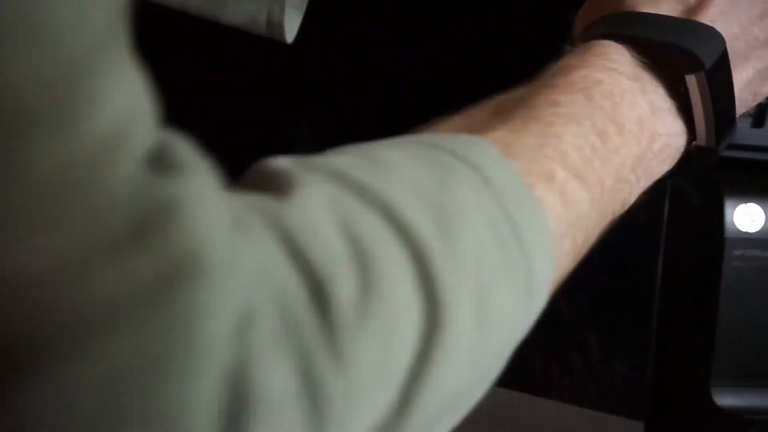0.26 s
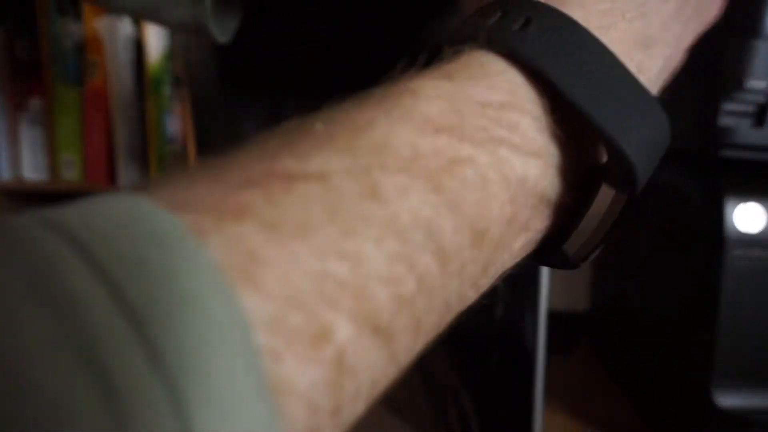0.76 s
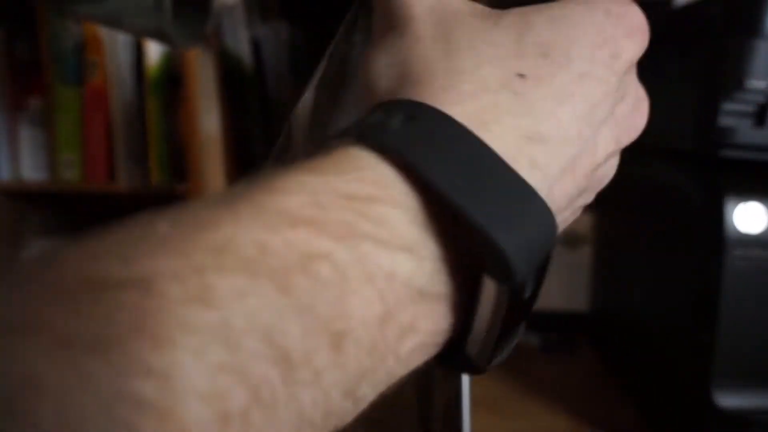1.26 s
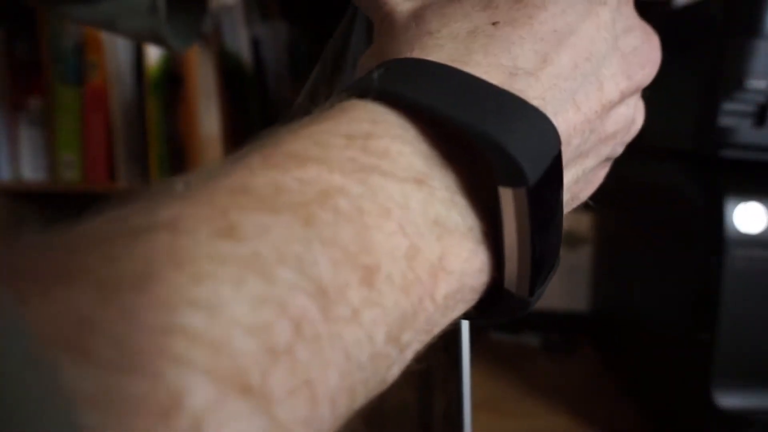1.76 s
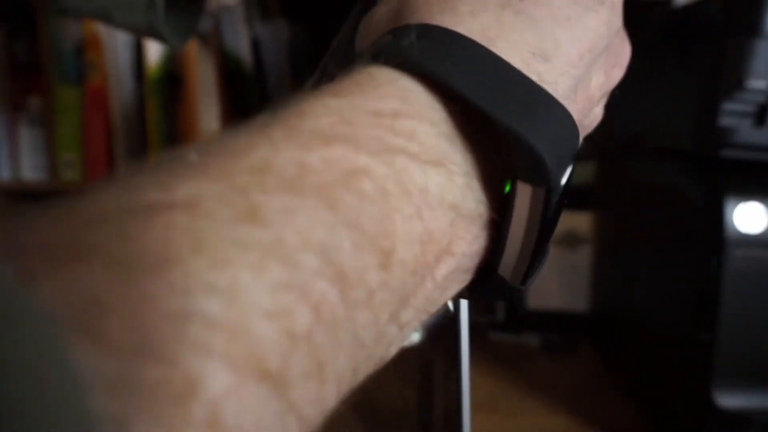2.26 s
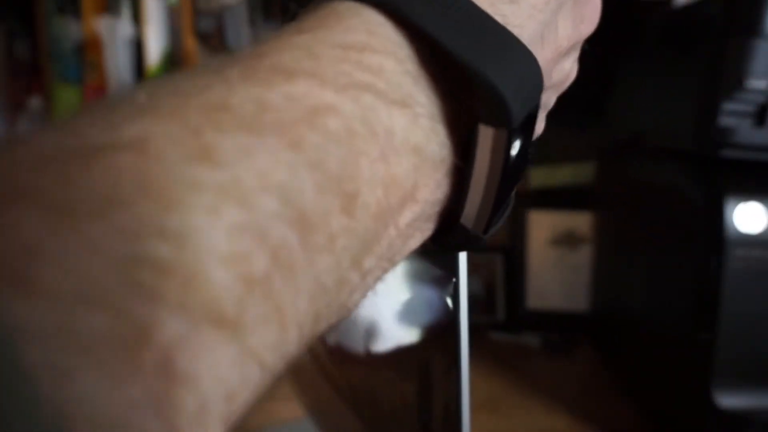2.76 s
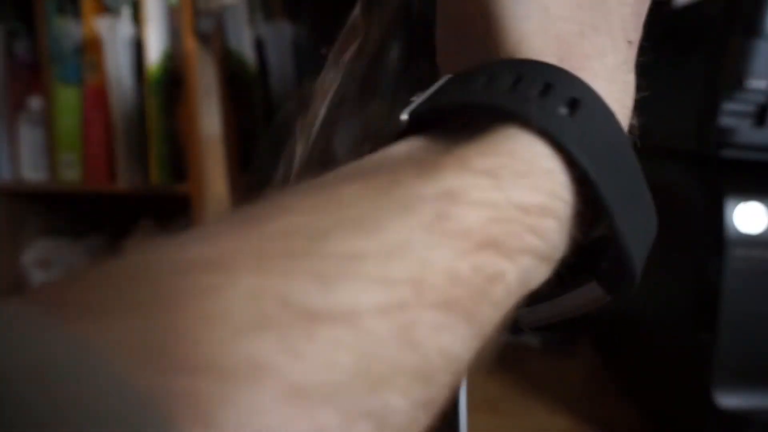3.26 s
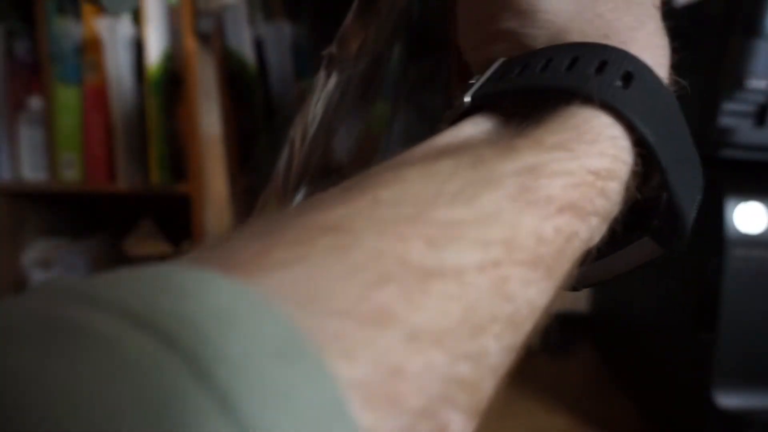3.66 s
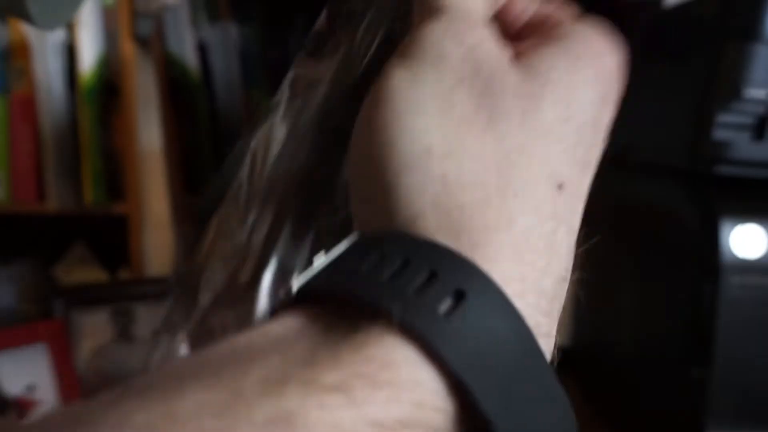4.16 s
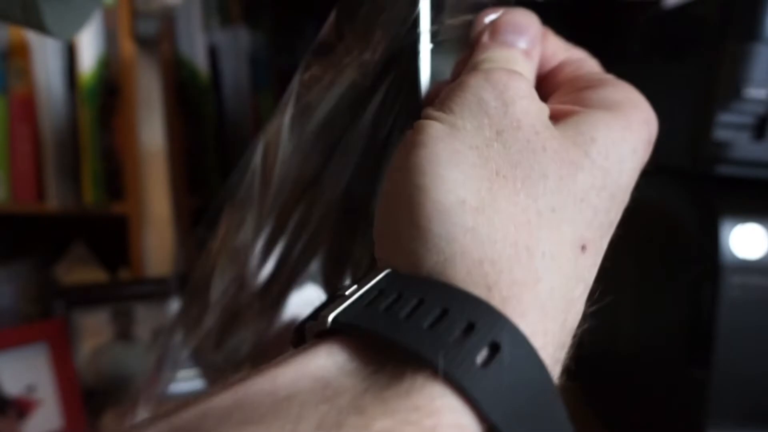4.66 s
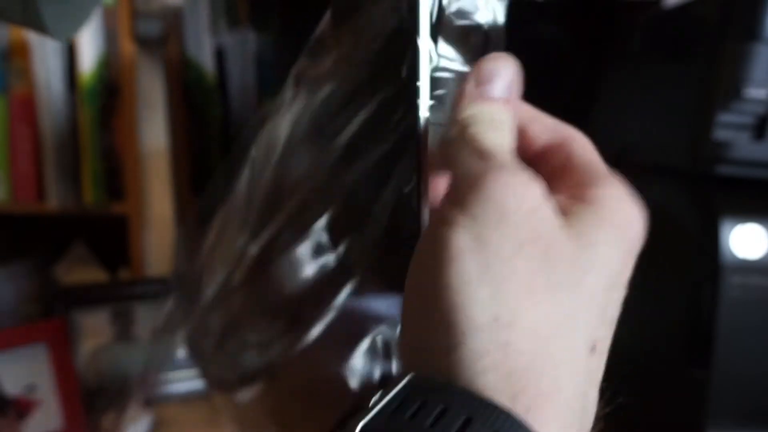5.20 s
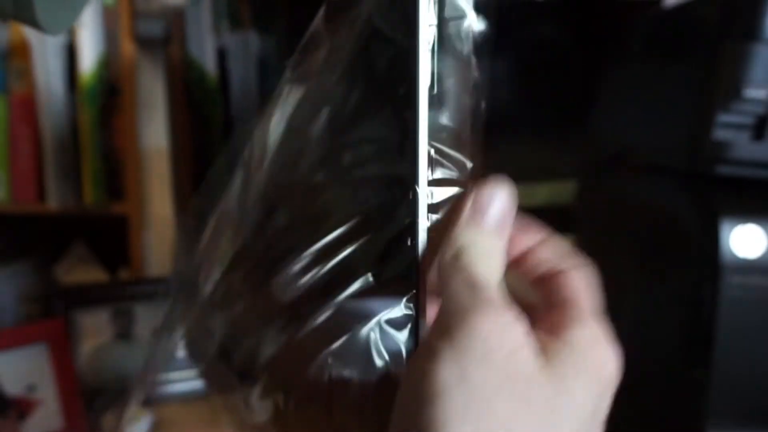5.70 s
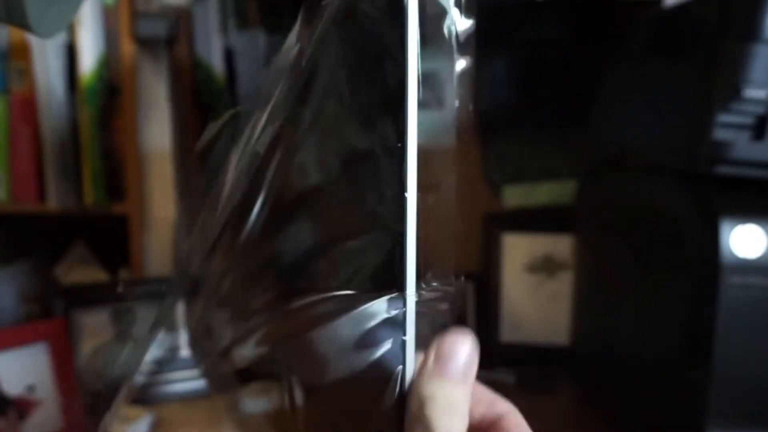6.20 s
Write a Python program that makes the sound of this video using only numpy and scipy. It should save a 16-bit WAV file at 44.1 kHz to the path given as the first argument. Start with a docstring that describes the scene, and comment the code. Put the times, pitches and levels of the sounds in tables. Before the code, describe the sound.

Thin plastic film is peeled by hand off a glass panel, close to the microphone in a small furnished room with little echo and quiet room tone. It begins with a faint rustle and a few tiny ticks. From about 0.5 seconds, sharp, bright snaps come irregularly, singly and in clusters, with finer crinkling between them. From around 1 second, tugs knock occasional soft, low thuds from the taut sheet and panel. Fingers drag faintly on the glass between about 1.6 and 3.4 seconds. The crackle thins briefly near 3.6 seconds, then returns at 4 seconds, denser, with rustling that swells on each short pull. From 5 seconds the crinkling is fuller and the snaps slightly lower in pitch, while the loose sheet rumbles softly as it sways. The strongest rustles come around 5.5 to 6 seconds, and the crackling continues until about 6.4 seconds.

```python
"""A faint rustle, then sharp snaps: thin plastic film is peeled by hand off a glass panel,
close to a camera in a small furnished room. Creases buckle and snap, each pitched by its size,
and finer crinkles rustle between them. Tugs make the taut sheet and its panel thud, the loose
sheet rumbles, and fingers drag softly on the glass, all over quiet room tone."""
import sys
import numpy as np
from scipy import signal
from scipy.fft import rfft, irfft, next_fast_len
from scipy.io import wavfile
from scipy.ndimage import map_coordinates

SR = 44100
rng = np.random.default_rng(int(sys.argv[2]) if len(sys.argv) > 2 else 0)


def output_pcm(signal):
    """Save a mono or channel-first signal as 16-bit PCM at the path in sys.argv[1].

    Samples are clipped to [-1, 1] before scaling.
    """
    pcm = np.clip(np.atleast_2d(signal).T, -1, 1) * 32767
    wavfile.write(sys.argv[1], SR, np.round(pcm).astype(np.int16))


N = 284004


def amp(db):
    return 10 ** (np.asarray(db) / 20)


def unit_rms(x):
    return x / np.sqrt(np.mean(x ** 2) + 1e-20)


def along(points, hz):
    """Read a curve of (Hz, value) points on a log frequency axis."""
    freqs, values = np.transpose(points)
    return np.interp(np.log(hz + 1), np.log(freqs + 1), values)


def filtered(x, response):
    """EQ x with a gain given as a function of Hz."""
    size = next_fast_len(x.shape[-1] + 8192)
    return irfft(rfft(x, size) * response(np.fft.rfftfreq(size, 1 / SR)), size)[..., :x.shape[-1]]


def wobble(rate):
    """A smooth random curve, rate knots a second."""
    return map_coordinates(rng.standard_normal(int(N * rate / SR) + 4), [np.arange(N) * rate / SR])


def swells(rest_db, start, held, db, rise_db_per_s, fall_db_per_s):
    """A fader ride in dB: each move climbs out of the resting level, holds from start and dies away."""
    hop = 32
    age = np.arange(0, N, hop) / SR - start[:, None]
    released = np.maximum(age - held[:, None], 0)
    moves_db = db[:, None] + rise_db_per_s * np.minimum(age, 0) - fall_db_per_s * released
    return np.maximum(rest_db, np.repeat(moves_db.max(axis=0), hop)[:N])


# Stereo image of diffuse sound. Each row: frequency in Hz, left-right correlation.
DIFFUSE_LIKENESS = [(200, 0.89), (700, 0.73), (1500, 0.076), (4000, 0.14), (12000, 0.39)]
def diffuse(pair):
    """Two unrelated signals become a left and right as alike as the room makes them."""
    angle = lambda hz: np.arccos(np.clip(along(DIFFUSE_LIKENESS, hz), -1, 1)) / 2
    mid, side = filtered(pair, lambda hz: np.array([np.cos(angle(hz)), np.sin(angle(hz))]))
    return np.array([mid + side, mid - side])


# Colour of the background. Each row: frequency in Hz, gain in dB.
ROOM_TONE_EQ = [(15, -71), (25, -35), (229, -27.5), (309, -2), (394, -15.5), (14800, -49.5), (16000, -22)]
def room_tone():
    """A steady bed of room tone and microphone hiss."""
    noise = diffuse(rng.standard_normal((2, N)))
    return amp(-61) * unit_rms(filtered(noise, lambda hz: amp(along(ROOM_TONE_EQ, hz))))


def crinkle(eq, rate, spread_db):
    """Tiny creases fire at random, in clumps, a few much larger than the rest."""
    clumps = amp(3.5 * wobble(30))
    fires = rng.random(N) < rate * clumps / SR
    sizes = amp(spread_db * np.minimum(rng.exponential(size=N), 2.8)) * rng.standard_normal(N)
    return unit_rms(filtered(fires * sizes, lambda hz: amp(along(eq, hz))))


def rustle(level_db, eq, gentle_db):
    """Gentle motion slides almost smoothly; firmer motion breaks into separate crinkles."""
    firmness = np.clip((level_db - gentle_db) / 18, 0, 1)
    grains = crinkle(eq, rate=600, spread_db=4.5)
    slide = crinkle(eq, rate=7000, spread_db=0.5)
    return amp(level_db) * (np.sqrt(firmness) * grains + np.sqrt(1 - firmness) * slide)


# Colours of fine crinkles and of large folds. Each row: frequency in Hz, gain in dB.
FINE_EQ = [(1200, -25), (2800, -3), (6000, 1.5), (11000, 3), (16000, -3.5)]
FOLD_EQ = [(250, 2), (600, 2.5), (1300, 7), (2400, 4), (7000, -6), (16000, -47.5)]
# The film shifting between pulls. Each row: time in seconds, crinkle level in dB, fold level in dB.
FILM_SHIFTS = [(0, -61, -54.5), (.15, -75, -69), (.5, -56.5, -52), (1.15, -58, -51), (1.63, -68, -75),
               (1.8, -58, -73), (1.95, -56.5, -67), (2.45, -53, -66), (2.65, -51.5, -57), (2.81, -61, -75),
               (3.05, -48.5, -72), (3.27, -65, -70), (3.6, -62.5, -73), (3.75, -69.5, -96),
               (4.099, -54, -70), (4.75, -56.5, -53), (5.45, -64.5, -65), (6.44, -59.5, -63)]
# Pulls. Each row: time of full speed in seconds, hold in seconds, crinkle level in dB, fold level in dB.
FILM_PULLS = [(.28, 0.1, -56.5, -58), (.45, 0.051, -49.5, -56), (.55, 0.0087, -56, -46.5),
              (.65, 0.09, -45, -47.5), (.79, .02, -53.5, -45), (0.979, 0.0041, -49.5, -42),
              (1.3, 0.06, -51, -45.5), (1.36, 0.069, -51.5, -44.5), (1.68, 0.069, -51.5, -49.5),
              (2.099, 0.084, -53, -49.5), (2.25, 0.052, -42.5, -54), (2.72, .05, -44.5, -69),
              (2.84, 0.08, -43, -56.5), (3.171, 0.016, -55.5, -48), (3.34, .02, -50.5, -52.5),
              (3.94, 0.073, -43.5, -62.5), (4.19, 0.011, -35.5, -48.5), (4.32, .01, -43, -54),
              (4.439, 0.13, -43, -73), (4.641, 0.0089, -35, -35), (4.869, 0.0098, -47.5, -54.5),
              (5.07, 0.012, -36.5, -42.5), (5.301, 0.022, -40.5, -37.5), (5.572, 0.017, -33.5, -32),
              (5.749, 0.017, -38.5, -37), (6.031, 0.007, -30, -38), (6.219, 0.014, -40.5, -36.5),
              (6.34, 0.034, -44.5, -50)]
def film_rustle():
    """Bright crinkles and darker folds rustle as the film moves, swelling with each pull."""
    now = np.arange(N) / SR
    shift_times, fine_rest_db, fold_rest_db = np.transpose(FILM_SHIFTS)
    start, held, fine_db, fold_db = np.transpose(FILM_PULLS)

    def ride(rest_db, pull_db):
        floor_db = np.interp(now, shift_times, rest_db)
        return swells(floor_db, start, held, pull_db, rise_db_per_s=288.5, fall_db_per_s=212.5)

    fine = rustle(ride(fine_rest_db, fine_db), FINE_EQ, gentle_db=-58.5)
    folds = rustle(ride(fold_rest_db, fold_db), FOLD_EQ, gentle_db=-59.0)
    return fine + folds


def bursts(start, db, hz, width, half_power_s, samples):
    """Each hit is a click and a short noisy flutter through a broad resonance; width is 1/Q."""
    age = np.arange(samples) / SR
    flutter_db = -3 * age / np.reshape(half_power_s, (-1, 1))
    kick = 0.5 * amp(flutter_db) * rng.standard_normal((len(start), samples))
    kick[:, 0] = 1
    u = 1j * np.fft.rfftfreq(2 * samples, 1 / SR) / hz[:, None]
    resonance = u * width / (1 + u * width + u * u)
    # a crease radiates little far below or far above its own pitch
    radiation = (u / (u + 0.18)) ** 2 / (1 + 0.37 * u)
    hits = irfft(rfft(kick, 2 * samples) * resonance * radiation)[:, :samples]
    hits *= amp(db)[:, None] / np.abs(hits).max(axis=1, keepdims=True)
    positions = np.round(start * SR).astype(int)[:, None] + np.arange(samples)
    return np.bincount(positions.ravel(), hits.ravel(), N + samples)[:N]


# Buckling creases. Each row: start in seconds, level in dB, pitch in Hz, body in dB over the crack.
CREASE_SNAPS = [(.1505, -44, 1890, 7), (.2704, -33.5, 5530, -15), (.2987, -31.5, 4250, -4),
                (0.4672, -25, 2060, 4.5), (0.5309, -19.5, 3600, -6.5), (.5971, -15.5, 6500, -16),
                (0.6147, -6.5, 6000, -14.5), (0.62, -13.5, 7450, -39), (.681, -17, 4800, -14),
                (0.7666, -20, 3880, 2), (.9261, -8, 5650, -14.5), (1.0662, -10, 5400, -22),
                (1.164, -25, 8400, -12), (1.205, -10, 3860, -10), (1.2329, -10.5, 2430, -6),
                (1.241, -10.5, 6400, -7), (1.2642, -2, 8800, -19.5), (1.365, -26, 2970, 3),
                (1.4197, -23, 5630, -1), (1.43, -8, 11300, -25), (1.4397, -7, 9400, -17),
                (1.581, -30, 6850, -19), (1.743, -24, 3620, -3.5), (1.8122, -17, 8100, -9),
                (1.98, -15.5, 8950, -23), (1.999, -14.5, 7100, -18), (2.0071, -6, 7700, -3),
                (2.2152, -16, 7900, -41), (2.219, -18.5, 3870, -14), (2.3432, -16, 5730, -12),
                (2.3504, 0, 7900, -50.5), (2.5124, -24.5, 6570, -9), (2.552, -8, 7400, -16.5),
                (2.5559, -12.5, 6300, -8.5), (2.8464, -1.5, 5830, -18.5), (2.9254, -20.5, 8050, -19),
                (2.9629, -14.5, 9700, -25), (2.9773, -3, 7500, -27), (3.155, -20, 5600, -35),
                (3.1738, -15, 4800, -20), (3.1897, -16, 5600, -10.5), (3.2944, -15, 6800, -17),
                (3.3448, -16, 7200, -23), (3.349, -6.5, 10000, -15), (3.521, -20.5, 10300, -21),
                (3.638, -40, 6440, -5), (3.9481, 0, 9200, -44), (3.9764, -14.5, 9300, -21),
                (3.98, -13, 6400, -23), (3.9872, -15, 6800, -39), (4.006, -15.5, 8250, -17),
                (4.0265, -13, 9300, -37.5), (4.034, -13, 7450, -53), (4.0373, -4.5, 7660, -34),
                (4.064, -16, 10000, -35), (4.146, -11.5, 9100, -47.5), (4.1772, -18.5, 10900, -33),
                (4.191, -3.5, 4720, -14.5), (4.2038, -8.5, 8500, -12), (4.3208, -10, 4150, -33),
                (4.4238, -20.5, 7600, -38), (4.4336, -8, 6850, -25), (4.4875, 2.5, 7850, -56),
                (4.4931, -4, 7050, -26), (4.5935, -1.5, 6400, -48), (4.5993, -10, 8000, -44),
                (4.613, -6.5, 6300, -37), (4.624, -3.5, 6900, -39), (4.6277, -7, 6760, -30),
                (4.6325, -8.5, 6700, -11.5), (4.6389, -5, 9100, -25), (4.664, -11, 6560, -31),
                (4.745, -9.5, 6200, -6.5), (4.7728, -8.5, 5240, -31), (4.8251, -3, 9200, -34),
                (4.861, -10.5, 4760, -13), (4.8743, -12.5, 6400, -16), (4.979, -18.5, 8100, -18),
                (5.0335, -14.5, 6160, -20), (5.0388, -21.5, 3370, 2), (5.0476, -14.5, 4900, -31),
                (5.0515, -11.5, 6700, -33), (5.0633, -1, 7600, -41), (5.0726, -4.5, 8040, -32),
                (5.1027, -11.5, 4440, -13), (5.1168, -7.5, 7800, -24), (5.138, -15, 8700, -30.5),
                (5.204, -21.5, 4800, -29.5), (5.2275, -8, 5660, -24), (5.2593, -9.5, 3770, -0.5),
                (5.2636, -5.5, 4240, -12), (5.3094, -18.5, 3900, -0.5), (5.499, -26.5, 4970, -34),
                (5.5145, -6, 3940, -35), (5.527, -9, 6600, -26), (5.541, -5.5, 8200, -39),
                (5.5493, -5, 5600, -31), (5.5563, -6.5, 7600, -29.5), (5.573, -6, 5660, -13),
                (5.5934, -7, 4760, -18), (5.6978, -7.5, 6660, -40), (5.7137, -3, 3660, -22),
                (5.7321, -11, 3020, -4.5), (5.739, -5.5, 3830, -11.5), (5.8274, -8.5, 6150, -20.5),
                (5.8671, -17, 3500, -5.5), (5.8805, -9.5, 4870, -13.5), (5.988, -19.5, 8100, -41),
                (5.9914, -0.5, 4470, -53), (5.9969, -6, 4960, -17), (6.0081, -4, 6600, -36),
                (6.033, -9, 8350, -17.5), (6.0502, -5, 2650, -13.5), (6.075, -11, 3100, -28),
                (6.1767, -9, 4400, -13.5), (6.2081, -13, 5940, -6), (6.2478, -14, 3600, -18),
                (6.327, -9.5, 3960, -20.5), (6.351, -14.5, 6000, -24.5), (6.3756, -22, 4700, -8.5)]
# Flutter shortens as the film is drawn tighter. Each row: time in seconds, factor on flutter length.
FLUTTER_SCALE = [(0, 1.3), (2.2, 1.26), (4.5, 0.84), (6.44, 0.65)]
def crease_snaps():
    """A crease flips: a crack pitched by its size, and a duller push of the film around it."""
    start, db, hz, body_db = np.transpose(CREASE_SNAPS)
    scatter = rng.standard_normal((len(start), 2))
    flutter_ms = 0.39 + 0.005 * body_db  # more body flutters longer
    flutter_ms *= np.interp(start, *np.transpose(FLUTTER_SCALE))
    flutter_ms = np.clip(flutter_ms, 0.05, 1) * np.exp(0.2 * scatter[:, 0])
    crack = bursts(start, db - 0.5, hz, width=1.79, half_power_s=flutter_ms / 1000, samples=384)
    body_hz = 950 * np.exp(0.15 * scatter[:, 1])
    body = bursts(start, db + body_db - 0.5, body_hz, width=1.0, half_power_s=0.00039, samples=512)
    return crack + body


# Tugs on the sheet. Each row: start in seconds, level in dB, pitch in Hz.
SHEET_TUGS = [(0.93, -30.5, 356), (1.059, -28.5, 320), (1.117, -30.5, 322), (1.117, -37.5, 118),
              (1.65, -38, 308), (1.814, -19, 340), (2.006, -27, 302), (2.346, -31.5, 308),
              (2.457, -32.5, 317), (2.529, -39.5, 133), (2.606, -22.5, 320), (2.841, -20.5, 340),
              (3.065, -35, 306), (3.168, -36.5, 323), (4.187, -29, 340), (4.315, -33.5, 340),
              (4.422, -36, 213), (4.862, -27, 312), (5.257, -19, 301), (5.594, -31, 204), (5.827, -30, 302),
              (5.85, -31, 110), (6.303, -36, 313), (6.308, -33, 113)]
def tug_thuds():
    """A tug knocks a short, low thud out of the taut sheet and its panel."""
    start, db, hz = np.transpose(SHEET_TUGS)
    return bursts(start, db + 0.5, hz, width=0.3, half_power_s=0.0012, samples=2048)


# Colour of the rumble. Each row: frequency in Hz, gain in dB.
RUMBLE_EQ = [(18, -61), (30, -24.5), (108, -13), (214, -1.5), (443, -4.5), (800, -18), (1040, -74),
             (1760, -120)]
# The loose sheet between jolts. Each row: time in seconds, level in dB.
SHEET_SWAY = [(0, -72), (1.2, -57), (1.6, -64.5), (2.1, -57), (2.4, -67), (2.69, -56.5), (3.44, -66),
              (4.4, -65), (5.4, -52), (6.12, -61), (6.44, -50)]
# Jolts. Each row: time of full level in seconds, hold in seconds, level in dB.
SHEET_JOLTS = [(.96, 0.0092, -44), (1.13, 0.009, -48), (4.44, 0.0061, -50.5), (4.95, 0.11, -45.5),
               (5.86, 0.013, -40.5), (6.33, 0.085, -46.5)]
def sheet_rumble():
    """The loose sheet rumbles as it sways, louder when jolted."""
    sway_db = np.interp(np.arange(N) / SR, *np.transpose(SHEET_SWAY))
    level_db = swells(sway_db, *np.transpose(SHEET_JOLTS), rise_db_per_s=220, fall_db_per_s=142)
    return amp(level_db) * crinkle(RUMBLE_EQ, rate=400, spread_db=2.0)


# Resonances of the glass. Each row: pitch in Hz, bandwidth in Hz, gain in dB.
PANEL_MODES = [(328, 40, 2), (534, 60, -11), (784, 18, -11), (970, 23, -12)]
# Fingers on the panel. Each row: time of full level in seconds, hold in seconds, level in dB.
FINGER_DRAGS = [(1.66, 0.11, -46.5), (2.04, 0.24, -44.5), (2.455, 0.067, -52), (2.63, .18, -48.5),
                (2.88, .1, -55.5), (3.08, 0.022, -56), (3.38, 0.062, -52.5)]
def finger_drag():
    """Skin slipping on glass shakes the panel at its lowest modes."""
    def panel(hz):
        return sum((-1) ** k * amp(db) * 1j * hz * width / (pitch ** 2 - hz ** 2 + 1j * hz * width)
                   for k, (pitch, width, db) in enumerate(PANEL_MODES))

    slips = rng.standard_normal(N) * amp(3.9 * wobble(40))
    level_db = swells(-120, *np.transpose(FINGER_DRAGS), rise_db_per_s=700, fall_db_per_s=400)
    return amp(level_db) * unit_rms(filtered(slips, panel))


# Reverb decay. Each row: frequency in Hz, seconds to fall 60 dB.
ROOM_DECAY = [(300, 0.16), (1400, 0.23), (4000, 0.18), (12000, 0.12)]
# Echoes off near furniture. Each row: delay in seconds, spread in seconds, level in dB over the tail.
FURNITURE_ECHOES = [(.0045, 0.00026, 9.5), (0.011, 0.00043, 1)]
# Reverb return. Each row: frequency in Hz, gain in dB.
REVERB_EQ = [(250, -1.5), (700, -1), (2500, -0.5), (12000, -0.5)]
def room(x):
    """Near furniture answers first; the tail dies by frequency and changes as the hands move."""
    block = SR // 16  # each block gets a fresh random tail
    wet = np.zeros((2, N + SR))
    for at in range(0, N, block):
        hz, t, noise = signal.stft(rng.standard_normal((2, SR // 2)), SR, nperseg=128)
        decay = amp(-60 * t / along(ROOM_DECAY, hz)[:, None])
        tail = signal.istft(noise * decay, SR, nperseg=128)[1]
        age = np.arange(tail.shape[1]) / SR
        fade_in = np.clip(age / 0.0012, 0, 1) ** 2
        echoes_db = sum(db * np.exp(-((age - delay) / spread) ** 2)
                        for delay, spread, db in FURNITURE_ECHOES)
        tail *= fade_in * amp(echoes_db)
        reverb = signal.fftconvolve(x[None, at:at + block], tail / np.linalg.norm(tail[0]), axes=1)
        wet[:, at:at + reverb.shape[1]] += reverb
    return x + filtered(diffuse(wet[:, :N]), lambda hz: amp(along(REVERB_EQ, hz)))


def scene():
    """Film and panel sound through the room, over its steady tone."""
    return room_tone() + room(crease_snaps() + film_rustle() + sheet_rumble() + tug_thuds() + finger_drag())


# Balance of the microphone pair. Each row: frequency in Hz, left minus right in dB.
MIC_BALANCE = [(100, 2.5), (400, 4.5), (1200, -0.5), (2500, -4), (12000, -1.2)]
def record(dry):
    """The microphone ports lean left or right by pitch, lift 2.3 kHz and lose deep bass and extreme top."""
    low_cut_hz, lift_hz, lift_width_hz, top_hz = 70, 2300, 600, 15900

    def ports(hz):
        balance = amp(along(MIC_BALANCE, hz) * np.array([[0.5], [-0.5]]))
        damping = 1j * hz * lift_width_hz
        lift = 1 + 0.5 * damping / (lift_hz ** 2 - hz ** 2 + damping)
        low_cut = 1j * hz / (low_cut_hz + 1j * hz)
        return balance * lift * low_cut

    return filtered(filtered(dry, ports), lambda hz: hz < top_hz)


dry = scene()
out = record(dry)
output_pcm(out)
```